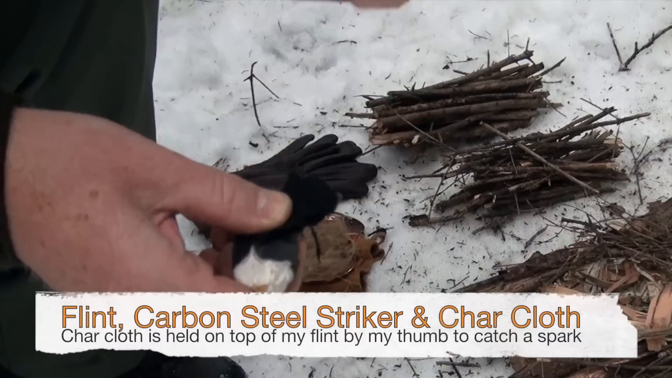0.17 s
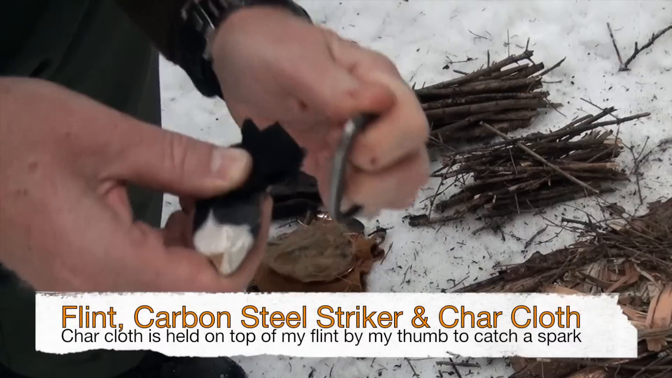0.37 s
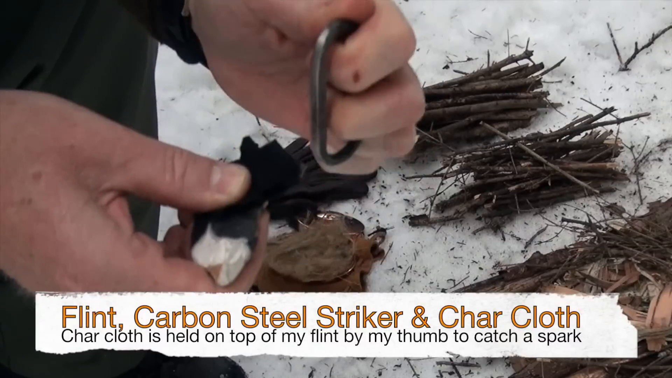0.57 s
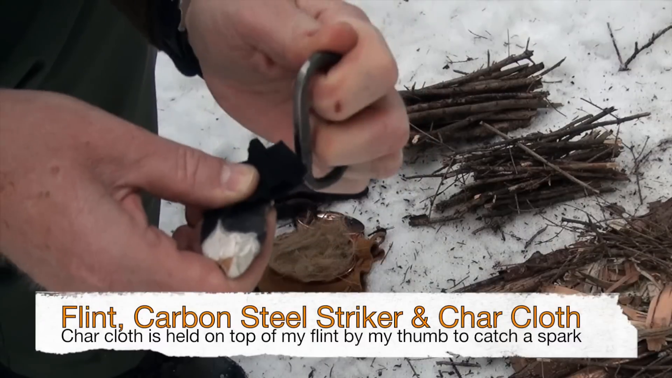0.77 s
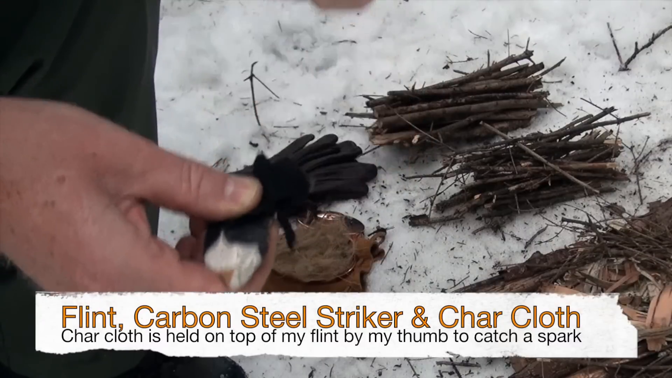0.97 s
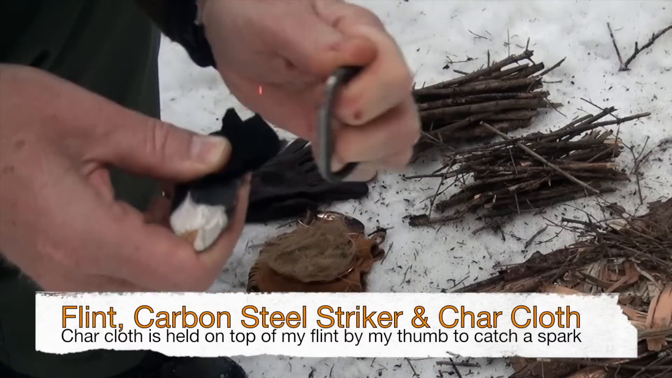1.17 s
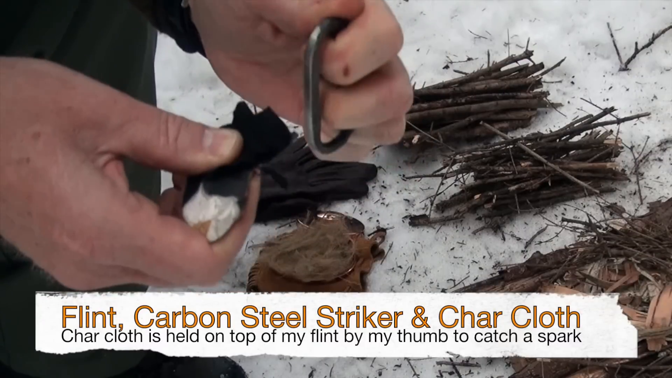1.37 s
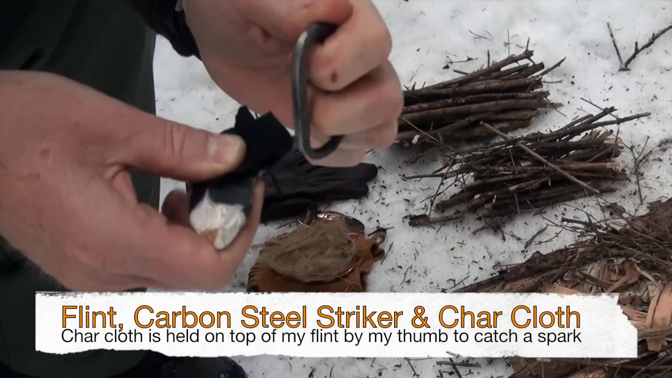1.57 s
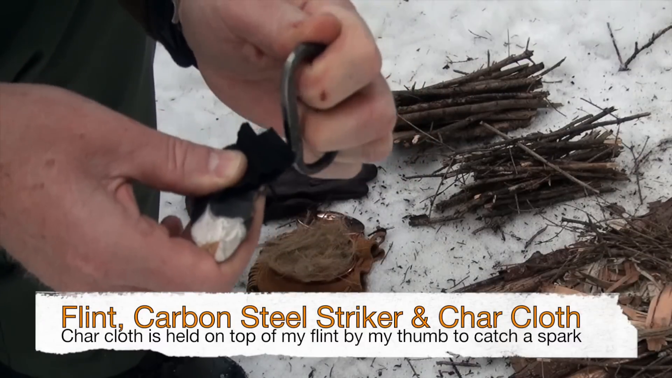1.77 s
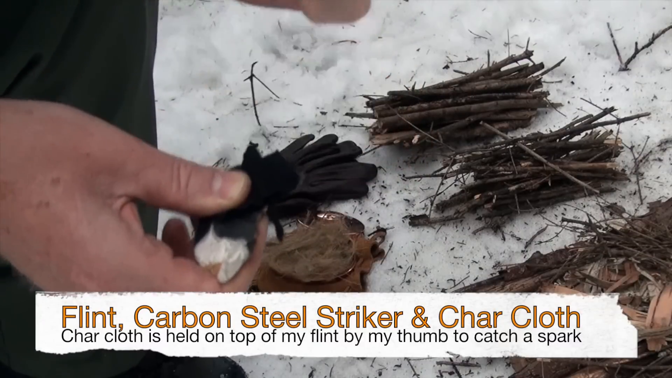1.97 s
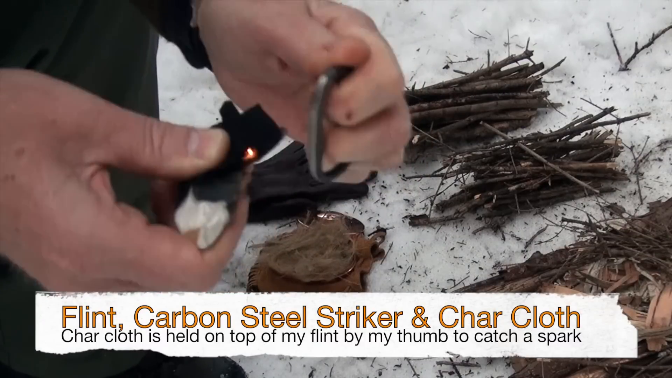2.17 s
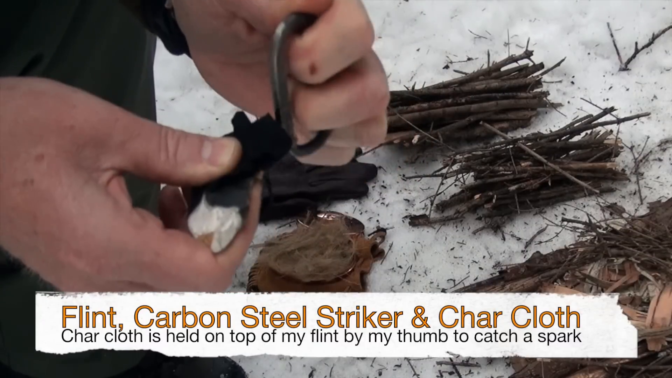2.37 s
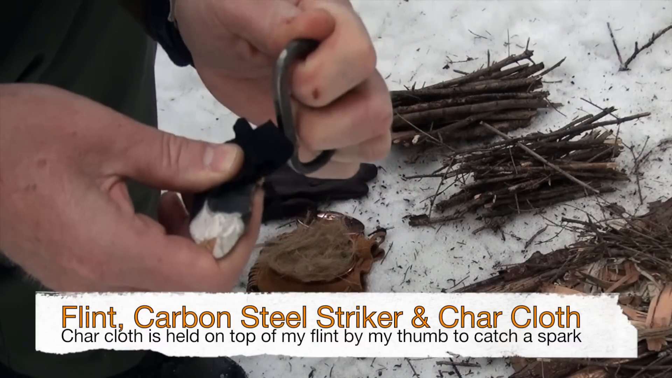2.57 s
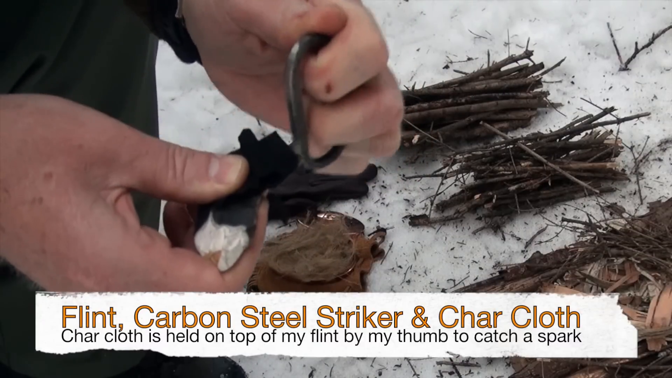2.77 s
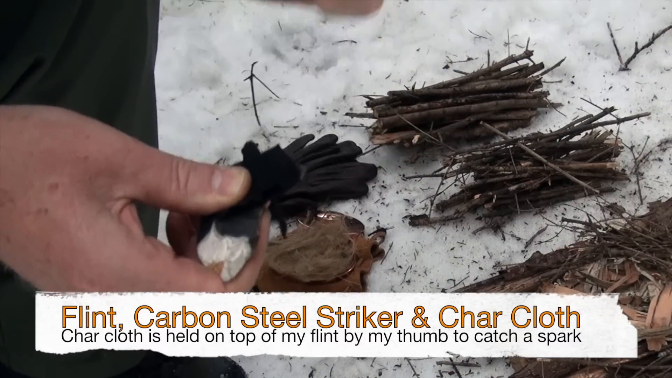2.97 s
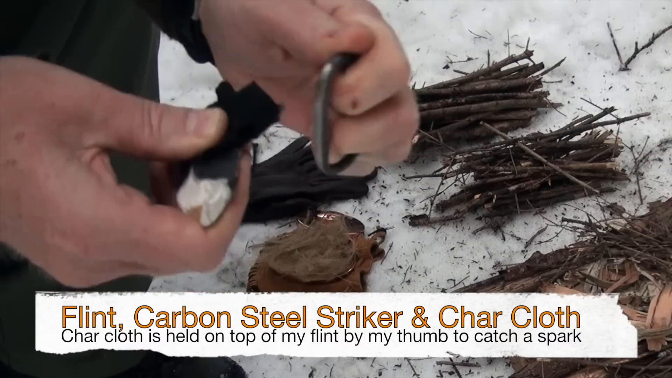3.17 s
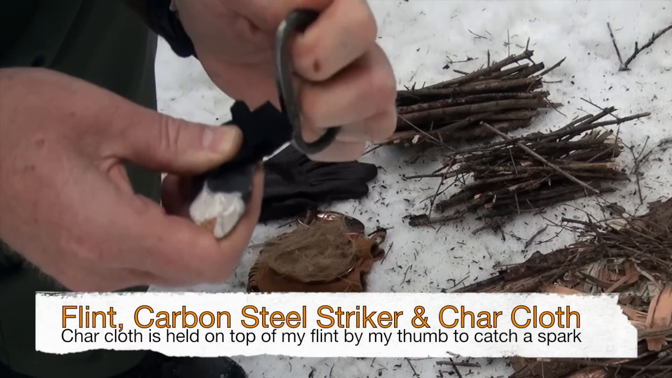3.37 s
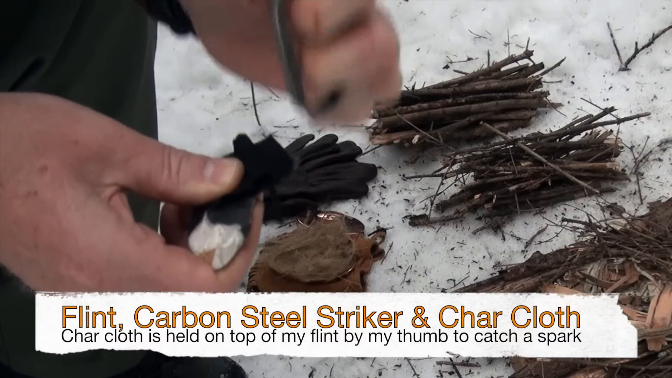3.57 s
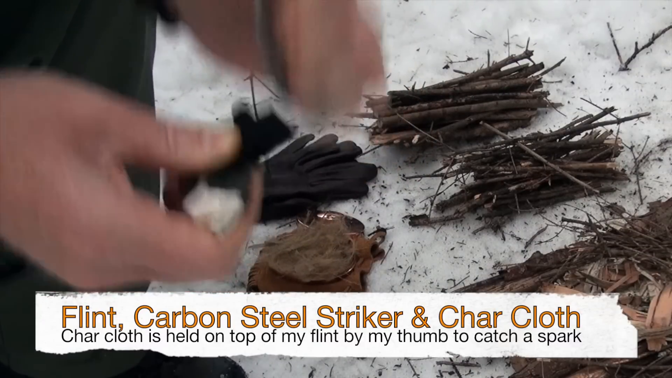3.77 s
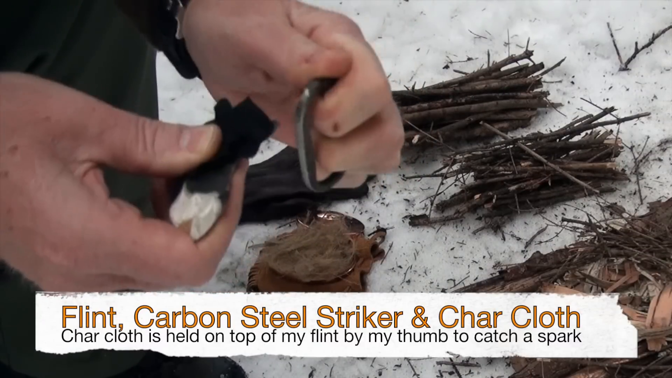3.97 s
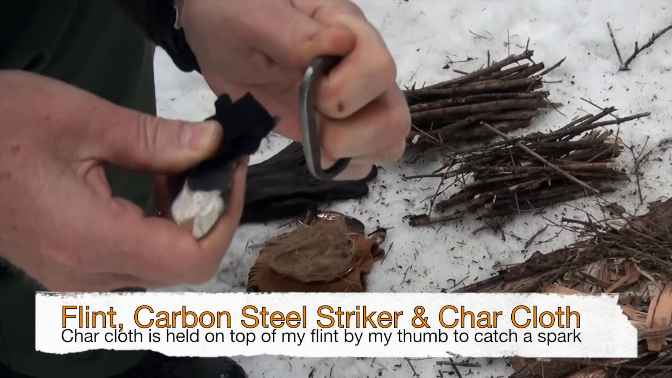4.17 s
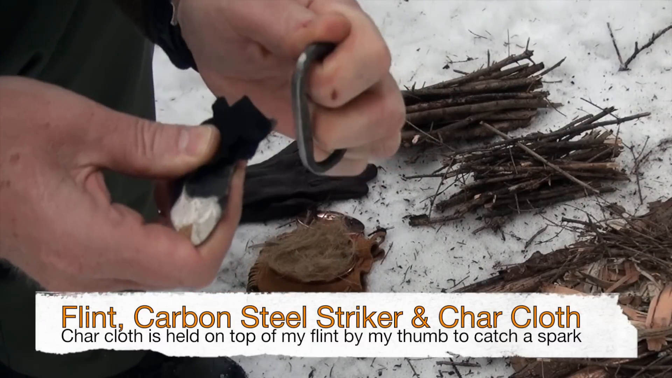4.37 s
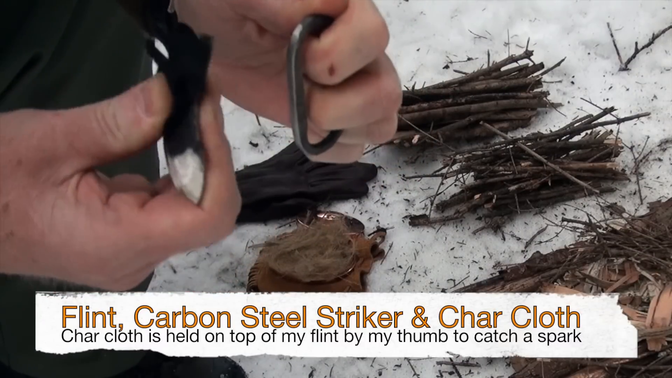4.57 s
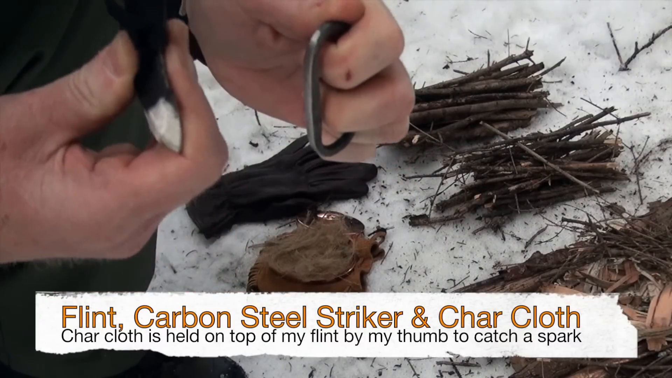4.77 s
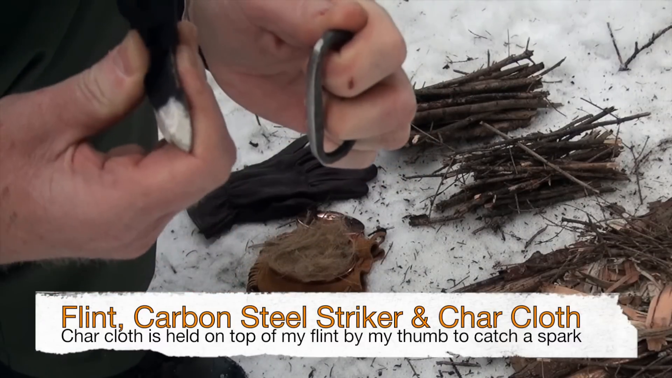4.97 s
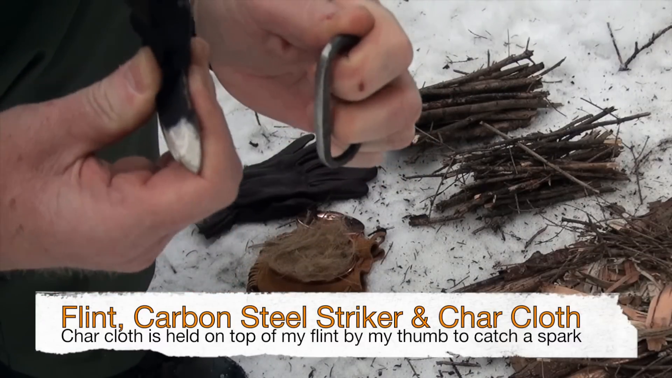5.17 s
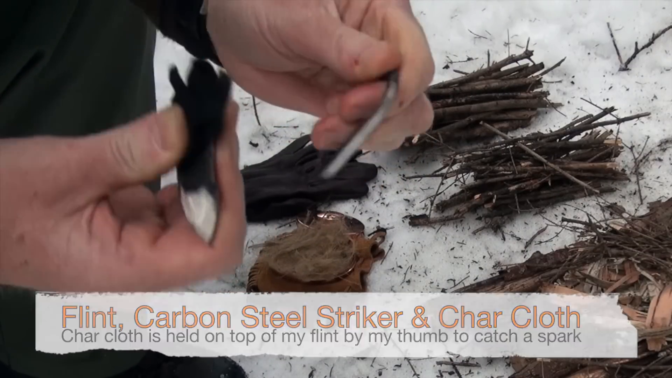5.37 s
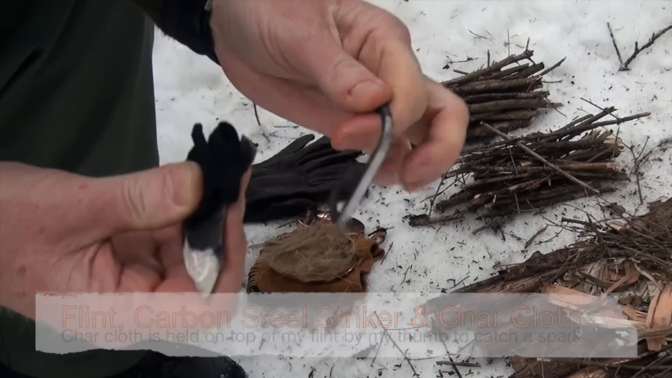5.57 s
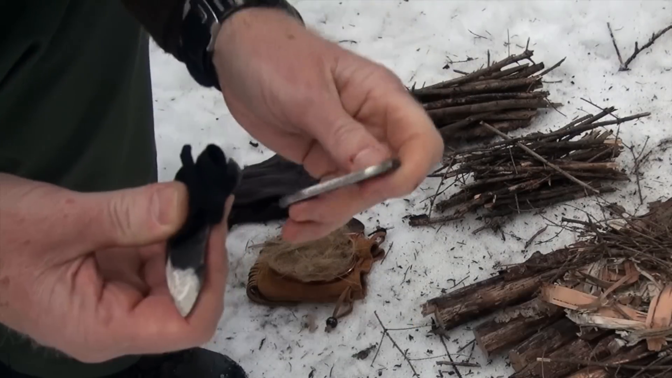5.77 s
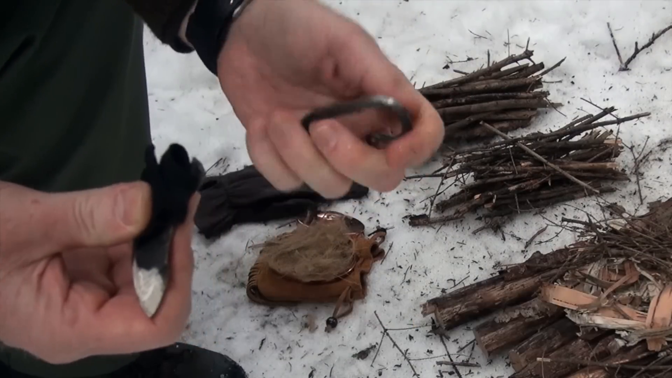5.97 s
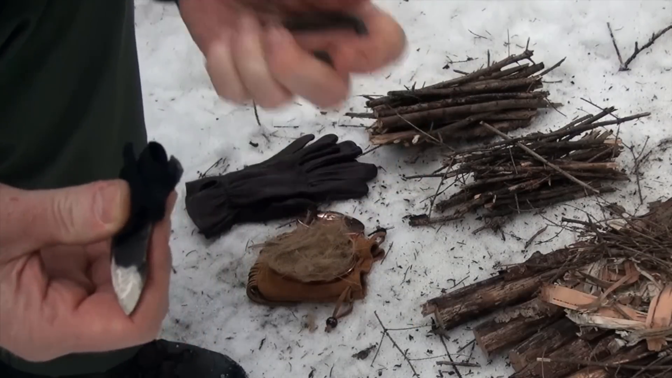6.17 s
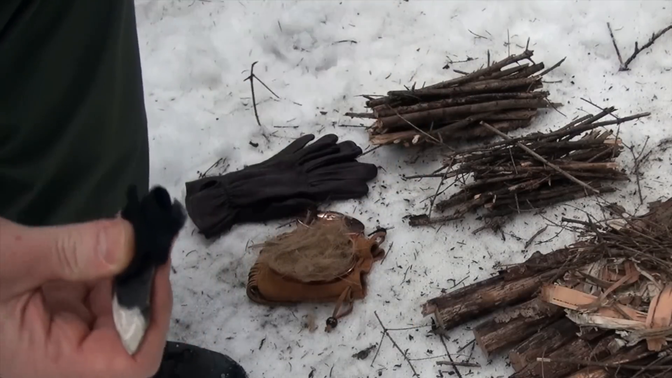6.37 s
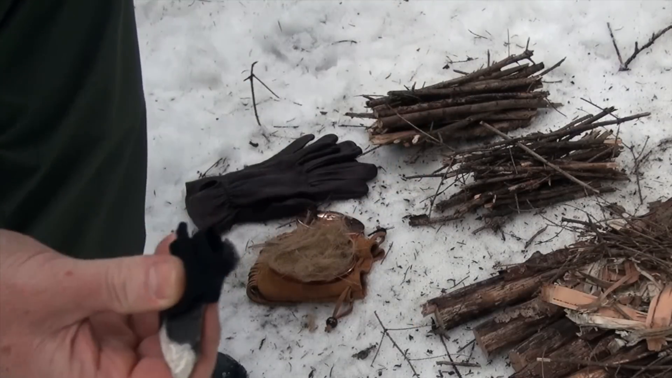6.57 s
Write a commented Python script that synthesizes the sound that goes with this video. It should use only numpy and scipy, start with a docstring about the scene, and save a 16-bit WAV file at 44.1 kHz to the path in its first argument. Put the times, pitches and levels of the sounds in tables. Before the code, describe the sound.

Close up outdoors, a steel striker hits a flint five times in about four seconds, each a hard, bright snap with a tiny gritty scrape and a thin, brief echo from trees. Softer taps of steel on stone fall between blows. Afterwards the flint clicks faintly in the fingers and cloth rustles. Far traffic murmurs low beneath a thin hiss.

```python
"""A steel striker hits a hand-held flint five times in a snowy wood: noise-driven modes and a free ring make
each crack and short scrape, and decaying noise is the echo from the trees.
Between blows, softer bursts through damped modes set the steel on the stone and shift the flint in the fingers.
Shaped noise gives the sleeve's rustle, light rubbing, far traffic with a low drone, and a thin hiss.
The level ducks just after loud peaks and creeps back."""
import sys
import numpy as np
from scipy import signal
from scipy.fft import rfft, irfft, next_fast_len
from scipy.io import wavfile
from scipy.ndimage import uniform_filter1d, map_coordinates

SR = 44100
rng = np.random.default_rng(int(sys.argv[2]) if len(sys.argv) > 2 else 0)


def materialize(psi):
    """Save the field psi as 16-bit PCM at rate SR to the path in sys.argv[1].

    A 1-D psi becomes a single channel; in a 2-D psi each row is a channel.
    """
    bounded = np.clip(np.atleast_2d(psi).T, -1, 1)
    quanta = np.round(bounded * 32767).astype(np.int16)
    wavfile.write(sys.argv[1], SR, quanta)


N = 291706

# Blows: t/s, crack level/dB, scrape level/dB, scrape length/s, brightness/(dB per octave),
# contact pitch f/Hz, lower ring level/dB, upper ring level/dB, echo level/dB
BLOWS = [(0.3243, -4, -8, 0.0059, 1, 8600, -38, -39, -21),
         (1.1088, -3, -15.5, 0.017, 1, 5300, -4, -28, -15),
         (2.116, -3, -13, 0.0082, -2.5, 8300, -36, -28, -25.5),
         (3.1140, -3, -16.5, 0.013, 0.5, 8400, -36, -38, -22),
         (3.8694, -4, -14.5, 0.017, 4.5, 10400, -33, -3, -17)]
# Modes of steel and flint pressed together: f/Hz, width/Hz, level/dB
PRESSED_MODES = [(2063, 116, 0), (2740, 80, 3), (3420, 180, 2), (4010, 73, 1.5), (4510, 310, -2),
                 (5390, 140, 0.5), (6130, 190, -10), (8800, 900, 0), (9600, 29, -15.5), (10820, 210, -0.5),
                 (12900, 110, -9), (14700, 480, -16), (15770, 36, -19.5)]


def strikes(graze_db=-22, graze_lead_s=0.0021, wet_db=-23):
    """Each blow grazes, cracks, scrapes and rings; the wood answers."""
    # the striker's free ring, as far as the grip allows: f/Hz, t60/s
    ring_modes = [(10580, 0.034), (15230, 0.027)]
    out, t = np.zeros((2, N)), clock(1 / 8)
    for s, crack_db, scrape_db, length_s, bright, pitch_hz, *rings_db, echo_db in BLOWS:
        ring = sum(amp(db - 60 * t / t60) * np.sin(2 * np.pi * hz * t)
                   for (hz, t60), db in zip(ring_modes, rings_db))
        contact = amp(crack_db) * crack(t, bright, pitch_hz)
        drag = amp(scrape_db) * scrape(t, length_s)
        blow = small_object(contact + drag + ring, edge_hz=1160)
        graze = small_object(rng.standard_normal(len(t)) * amp(-60 * t / 0.011), edge_hz=11000)
        add(out, s - graze_lead_s, amp(graze_db) * graze)
        add(out, s, blow * balance(0.7))
        # summed over all directions the blow is nearly even in colour, so most of its echo is plain hiss
        echo = filtered(trees(), colour([(1000, 0), (16000, 4 * bright)]))
        add(out, s, amp(echo_db) * burst(echo))
        add(out, s, amp(wet_db) * signal.fftconvolve(blow, trees(), axes=1))
    return out


def crack(t, bright, pitch_hz, bite_s=0.00038, t60=0.0056, chatter_db=-17, chatter_t60=0.027,
          body_db=-4, contact_db=-4, contact_width_hz=800):
    """The steel bites the edge: a bare snap, the contact's own pitch, and the ring of steel and stone."""
    # colour of the bare contact: f/Hz, level/dB
    snap_colour = [(1000, -17), (2000, -8.5), (3400, -3.5), (5500, -2), (6800, -5.5), (8200, 3), (10500, 3),
                   (11800, -9), (13700, -6), (15800, -8)]
    bite = amp(-60 * np.maximum(t - bite_s, 0) / t60)
    envelope = bite + amp(chatter_db - 60 * t / chatter_t60)
    force = lambda: grit(envelope, side_db=-17.5)
    tilted = colour([(hz, db + bright * np.log2(hz)) for hz, db in snap_colour])
    snap = burst(causal(force(), tilted(np.fft.rfftfreq(1024, 1 / SR))))
    contact = burst(filtered(force(), resonances([(pitch_hz, contact_width_hz, 0)])))
    body = burst(filtered(force(), resonances(PRESSED_MODES, bright)))
    return burst(snap + amp(contact_db) * contact + amp(body_db) * body)


def scrape(t, length_s, body_bright=-1.5, spray_db=-2, release_s=0.0024, grain_db=3):
    """The steel drags along the edge and sheds tiny chips, then leaves it."""
    drag = (1 - np.exp(-t / 0.0038)) * np.exp(-np.maximum(t - length_s, 0) / release_s)
    # a new random chip size every 16 samples
    sizes = rng.standard_normal(len(t) // 16 + 1).repeat(16)[:len(t)]
    chips = pair(len(t), side_db=-11.5) * amp(grain_db * sizes)
    spray = filtered(chips, colour([(900, -14), (1700, -0.5), (4200, -3.5), (7000, -2),
                                    (12000, -41), (15800, -1.5)]))
    body = filtered(chips, resonances(PRESSED_MODES, body_bright))
    return drag * unit(unit(body) + amp(spray_db) * unit(spray))


def grit(envelope, side_db):
    """The force of a gritty contact: a short burst of micro-impacts, even in colour."""
    force = pair(len(envelope), side_db) * envelope
    power = np.abs(rfft(force.mean(axis=0), 1024)) ** 2
    # undo the burst's own smoothed spectrum
    flatten = np.abs(uniform_filter1d(power, size=25)) ** -.5
    return burst(causal(force, flatten))


def trees(t60=0.34, onset_s=0.0055, lumpy_db=1.5):
    """Trunks and branches scatter a thin, bright, uneven echo; the left side has energy 1."""
    # what the trees send back: f/Hz, level/dB
    echo_colour = [(800, -15), (2200, -3), (3200, 0), (4600, 1), (5400, 1), (6500, 3.5), (7600, -4),
                   (9000, -2.5), (11500, -6.5), (14000, -9), (15800, -13)]
    t = clock(2 / 3)
    lumps = lumpy_db * wobble(243)[:len(t)]
    scatter = filtered(around(len(t), narrow_db=-16), colour(echo_colour))
    tail = scatter * amp(lumps - 60 * t / t60) * (1 - np.exp(-t / onset_s))
    return tail / np.linalg.norm(tail[0])


def touches(events, modes):
    """Light contacts set damped modes ringing; a sliding touch has longer grit."""
    out, t = np.zeros((2, N)), clock(1 / 16)
    for s, db, bright, grit_t60 in events:
        force = grit(amp(-60 * t / grit_t60), side_db=-14)
        touch = small_object(filtered(force, resonances(modes, bright)), edge_hz=600)
        add(out, s, amp(db) * burst(touch))
    return out


def taps():
    """The steel is set against the stone; each damps the other's modes."""
    # contacts: t/s, level/dB, brightness/(dB per octave), grit t60/s
    contacts = [(0.021, -40.5, -4, 0.052), (0.0514, -36.5, -14, 0.081), (0.7706, -12.5, 1, 0.007),
                (1.7281, -25, -8, 0.0046), (1.744, -44, -5.5, 0.037), (3.4708, -24, -5.5, 0.0091),
                (3.5514, -35.5, -13, 0.054), (6.5885, -34, -2, 0.008)]
    # steel and stone damped by each other: f/Hz, width/Hz, level/dB
    damped_modes = [(1400, 460, -18), (1980, 150, -4), (2270, 250, -3.5), (3270, 270, -3.5),
                    (3640, 300, -6), (4170, 200, 0), (6070, 300, -6), (6600, 270, -12), (8520, 240, -6.5),
                    (10700, 400, -19), (11100, 490, -17)]
    return touches(contacts, damped_modes)


def clicks():
    """The flint clicks in the fingers, its modes broadened by the hold."""
    # flint clicks: t/s, level/dB, brightness/(dB per octave), grit t60/s
    flint_clicks = [(2.2095, -27.5, 3, 0.013), (2.5312, -41, 12, 0.018), (5.0175, -38.5, 3, 0.011),
                    (5.0808, -18, -1.5, 0.0024), (5.3294, -36.5, 5, 0.013)]
    # flint in the fingers: f/Hz, width/Hz, level/dB
    flint_modes = [(2300, 360, 1.5), (2880, 340, 0.5), (4300, 2300, -12.5), (5970, 940, -5),
                   (7160, 590, 1.5), (10550, 630, -4.5), (11700, 890, -5.5), (13500, 1000, -23)]
    return touches([*flint_clicks, *fidgets()], flint_modes) * balance(1.5)


def fidgets(count=5, level_db=-43, spread_db=2, bright=7, bright_spread=7, grit_t60=.011):
    """Faint ticks at uneven intervals while the flint is turned over, as rows like the flint clicks."""
    start_s, end_s = 5.27, 5.62
    ticks = []
    for k, (when, size, tone) in enumerate(rng.uniform(-1, 1, (count, 3))):
        s = start_s + (end_s - start_s) * (k + (when + 1) / 2) / count
        ticks.append((s, level_db + spread_db * size, bright + bright_spread * tone, grit_t60))
    return ticks


def sleeve(rest_db=-61, swing_db=-51.5, lead_s=0.076, rise_s=0.22, fall_s=0.58):
    """Cloth rustles as coloured noise, swelling with every arm movement and never quite still."""
    # rustle colour: f/Hz, level/dB
    cloth_colour = [(880, -15), (1500, -1.5), (2060, -1), (2450, -4), (3400, -3.5), (7400, -7),
                    (11000, -15), (12100, -7), (15800, -37)]
    # the arm turns the flint over, lowers the steel and draws back:
    # fastest motion t/s, level/dB, rise/s, fall/s
    reaches = [(4.95, -50.5, .33, 0.2), (6.1, -50, 0.98, .6), (6.36, -39, 0.084, 0.16),
               (6.6, -42, 0.11, .1)]
    flutter = amp(0.69 * wobble(60) + 0.82 * wobble(700))
    rustle = unit(filtered(around(N, narrow_db=-10.0), colour(cloth_colour)) * flutter)
    # each swing is fastest just before its blow
    swings = [(s - lead_s, swing_db, rise_s, fall_s) for s, *_ in BLOWS]
    moves = sum(stroke(*move) ** 2 for move in [*swings, *reaches])
    return np.sqrt(amp(rest_db) ** 2 + moves) * rustle


def steel_rub():
    """The steel slides lightly on the stone: unsteady noise through broad modes."""
    # rubbing modes: f/Hz, width/Hz, level/dB
    slide_modes = [(4530, 1400, 1), (5600, 500, 2), (10000, 1000, 4), (11000, 500, -15)]
    rub = unit(filtered(pair(N, side_db=-15), resonances(slide_modes)) * amp(3.6 * wobble(190)))
    return stroke(2.515, db=-49, rise_s=0.031, fall_s=0.044) * rub


def finger_slide():
    """The fingers slide over the flint: unsteady noise through a single mode."""
    skin = unit(filtered(pair(N, side_db=-14), resonances([(5200, 520, 0)])) * amp(2.9 * wobble(180)))
    return stroke(5.005, db=-50.5, rise_s=0.04, fall_s=0.023) * skin


def stroke(s, db, rise_s, fall_s):
    """Gain of one hand movement: it speeds up until time s, then comes to rest."""
    t = np.arange(N) / SR - s
    return amp(db) * np.exp(np.minimum(t / rise_s, -t / fall_s))


def traffic():
    """Far traffic and its rumble: coloured noise that slowly draws nearer."""
    # murmur colour: f/Hz, level/dB
    road_colour = [(100, -23), (230, -5), (400, -1), (650, 1.5), (850, -0.5), (1050, -5.5), (1300, -11.5),
                   (1900, -17.5), (4000, -27)]
    # rumble colour: f/Hz, level/dB
    rumble_colour = [(15, -18), (30, -16), (48, -10.5), (64, -2.5), (85, -0.5), (110, 0.5), (150, -0.5),
                     (190, -8.5), (260, -18.5), (500, -46)]
    t = np.arange(N) / SR
    road = unit(filtered(around(N), colour(road_colour))) * balance(0.7)
    rumble = unit(filtered(around(N), colour(rumble_colour)))
    # start level in dB, rise in dB per second, slow random drift in dB
    road_db = -41 + 0.33 * t + 0.53 * wobble(9.4)
    rumble_db = -44.5 + 0.35 * t + 0.11 * wobble(4.2)
    return amp(road_db) * road + amp(rumble_db) * rumble


def drone():
    """A low drone: noise through a narrow resonance applied twice."""
    narrow = lambda hz: resonances([(64.6, 5, 0)])(hz) ** 2
    return amp(-49.0) * unit(filtered(around(N), narrow))


def hiss():
    """A thin steady hiss of coloured noise."""
    # hiss colour: f/Hz, level/dB
    hiss_colour = [(300, 13.5), (1500, 0.5), (2500, 3.5), (4000, 1.5), (6500, -3), (9000, -32), (10500, -6),
                   (11500, -3), (13000, -11), (15800, -12)]
    return amp(-52.0) * unit(filtered(around(N), colour(hiss_colour))) * balance(0.3)


def around(size, narrow_db=0):
    """Left and right noise from all around: nearly alike in the bass, widest near 2 kHz."""
    # width of the sound: f/Hz, side over mid level/dB
    side_colour = [(60, -38), (110, -39), (200, -15), (380, -12.5), (700, -9.5), (1290, -0.5), (2380, 3.5),
                   (4400, 1), (8120, 1), (15000, -25)]
    mid, side = rng.standard_normal((2, size))
    side = amp(narrow_db) * filtered(side, colour(side_colour))
    return np.array([mid + side, mid - side])


def pair(size, side_db):
    """Left and right noise with a common part and a weaker opposed part."""
    mid, side = rng.standard_normal((2, size))
    return unit(np.array([mid + amp(side_db) * side, mid - amp(side_db) * side]))


def balance(db):
    """Left and right gains that raise the left and lower the right by db."""
    return amp([[db], [-db]])


def wobble(rate):
    """A smooth random curve, rate knots a second."""
    return map_coordinates(rng.standard_normal(int(N * rate / SR) + 4), [np.arange(N) * rate / SR])


def resonances(modes, bright=0):
    """Response of (Hz, width, dB) modes of alternating sign, tilted by bright dB per octave above 1.5 kHz."""
    def response(f):
        tilt = amp(bright * np.log2(np.clip(f, 1500, None) / 1500))
        return tilt * sum((-1) ** k * amp(db) * 1j * f * width / (centre * centre - f * f + 1j * f * width)
                          for k, (centre, width, db) in enumerate(modes))
    return response


def colour(points):
    """Frequency response through (Hz, dB) points."""
    f, db = np.transpose(points)
    return lambda hz: amp(np.interp(np.log(hz + 1), np.log(f), db))


def filtered(x, response):
    """x times a frequency response, real or complex."""
    n = x.shape[-1]
    m = next_fast_len(n + SR // 8)
    return irfft(rfft(x, m) * response(np.fft.rfftfreq(m, 1 / SR)), m)[..., :n]


def causal(x, gain):
    """x through the minimum-phase filter that has this gain (513 bins)."""
    cepstrum = irfft(np.log(gain + 1e-9))
    # fold the cepstrum onto positive time
    cepstrum[1:512] *= 2
    cepstrum[513:] = 0
    return signal.fftconvolve(x, irfft(np.exp(rfft(cepstrum)))[None], axes=1)[:, :x.shape[1]]


def small_object(x, edge_hz):
    """Small objects radiate little below an edge."""
    return signal.sosfilt(signal.butter(2, edge_hz, "high", fs=SR, output="sos"), x)


def amp(db):
    """Decibels to gain."""
    return 10 ** (np.asarray(db) / 20)


def unit(x):
    """Scale to rms 1."""
    return x / np.sqrt(np.mean(x ** 2) + 1e-20)


def burst(x):
    """Scale a short sound to the energy of 2 ms at rms 1."""
    return x / np.sqrt(np.mean(np.sum(x ** 2, axis=-1)) / (SR / 500))


def clock(seconds):
    """Sample times of a stretch."""
    return np.arange(int(seconds * SR)) / SR


def add(track, s, x):
    """Mix x into track from time s."""
    part = track[:, max(round(s * SR), 0):][:, :x.shape[-1]]
    part += x[..., :part.shape[1]]


def scene():
    """Blows, taps and clicks close by, in the quiet wood; only the blows are loud enough to raise an echo."""
    handling = sleeve() + steel_rub() + finger_slide()
    background = traffic() + drone() + hiss()
    return strikes() + taps() + clicks() + handling + background


def record(dry, threshold_db=-9, recovery_db_per_s=12, attack_s=0.00059, top_hz=15850):
    """The gain drops just after a loud peak and recovers at a steady rate; peaks clip and the top is cut."""
    t = np.arange(N) / SR
    power = np.abs(uniform_filter1d(np.mean(dry ** 2, axis=0), size=88))  # over 2 ms
    level_db = 10 * np.log10(power + 1e-12)
    excess = np.maximum(level_db - threshold_db, 0)
    # hold the largest excess while it falls steadily
    recovery = recovery_db_per_s * t
    held = np.maximum.accumulate(excess + recovery) - recovery
    pole = np.exp(-1 / (attack_s * SR))
    ducked = dry * amp(-signal.lfilter([1 - pole], [1, -pole], held))
    return filtered(np.clip(ducked, -.92, .92), lambda hz: 1 / (1 + (hz / top_hz) ** 160))


dry = scene()
out = record(dry)
materialize(out)
```